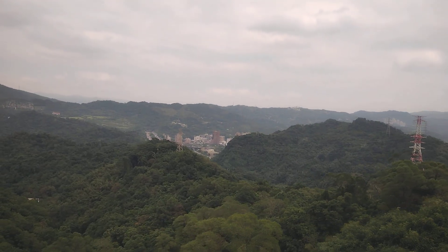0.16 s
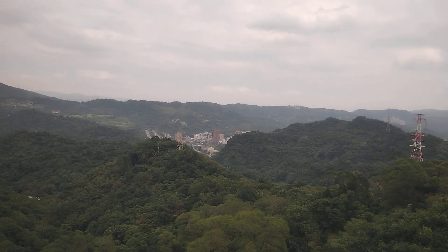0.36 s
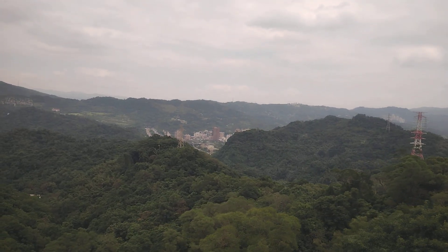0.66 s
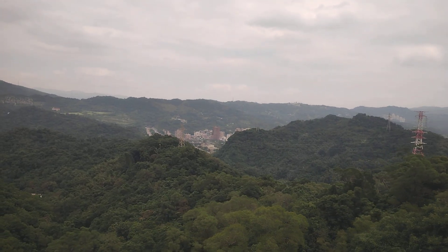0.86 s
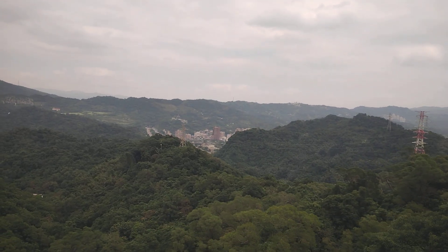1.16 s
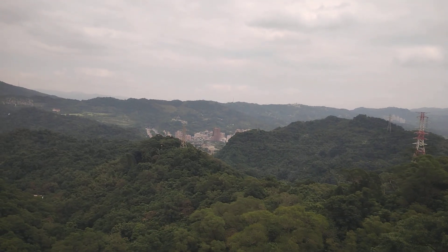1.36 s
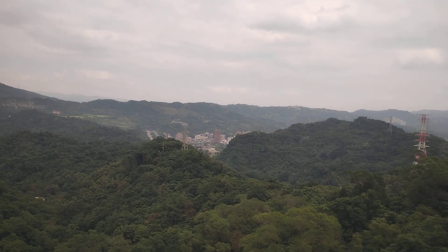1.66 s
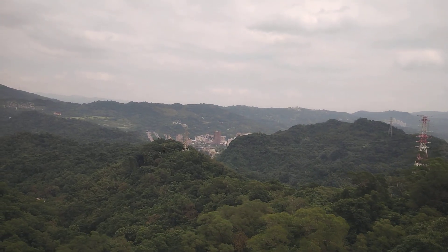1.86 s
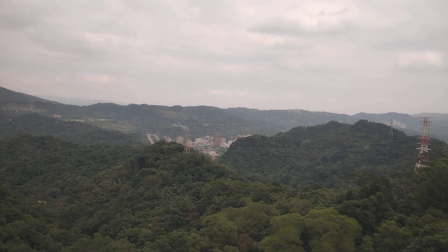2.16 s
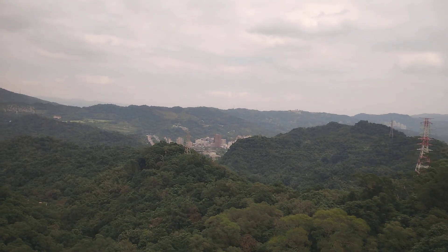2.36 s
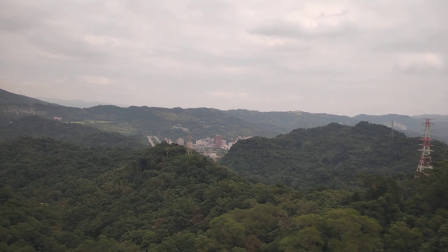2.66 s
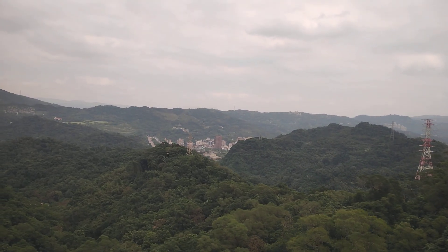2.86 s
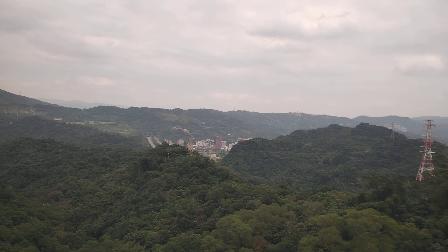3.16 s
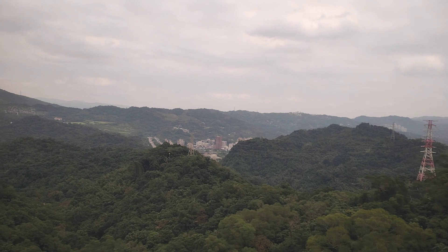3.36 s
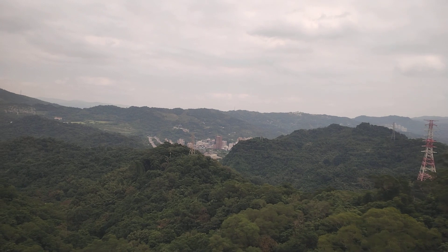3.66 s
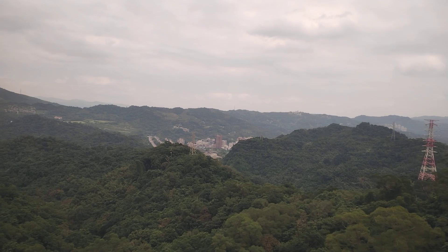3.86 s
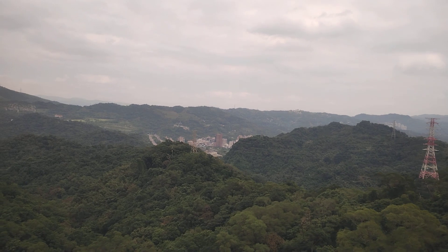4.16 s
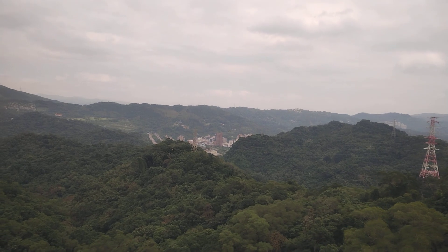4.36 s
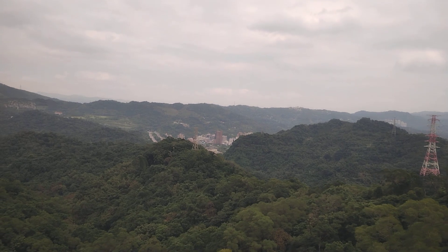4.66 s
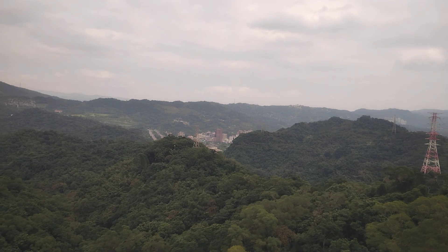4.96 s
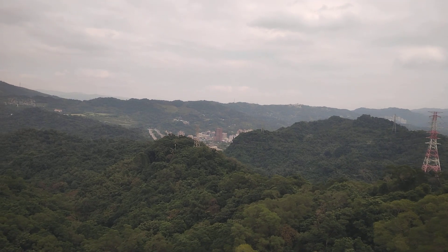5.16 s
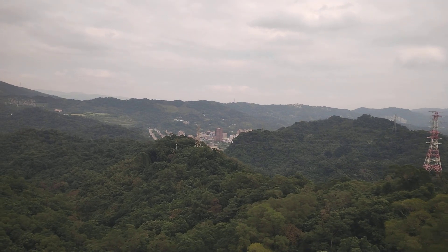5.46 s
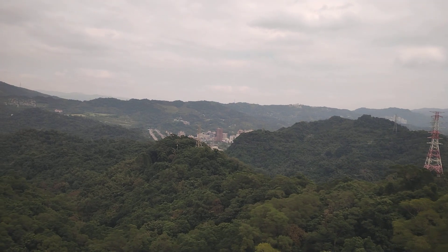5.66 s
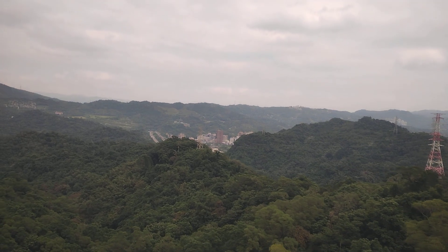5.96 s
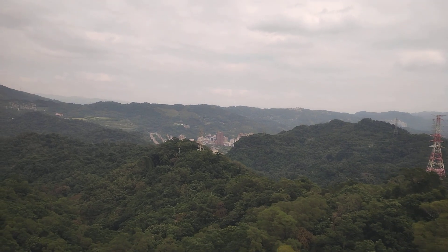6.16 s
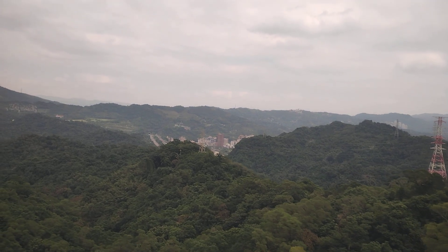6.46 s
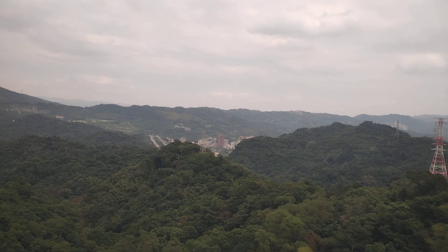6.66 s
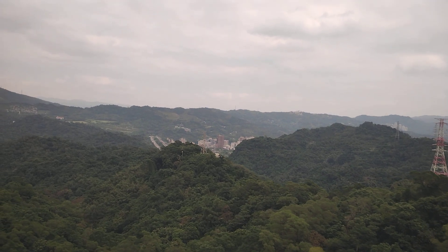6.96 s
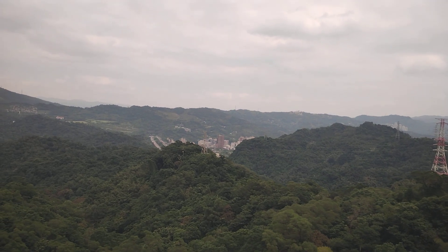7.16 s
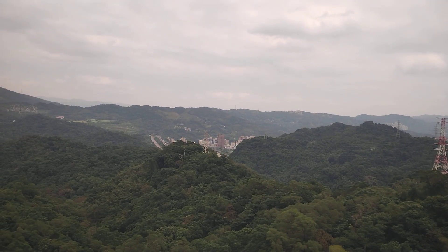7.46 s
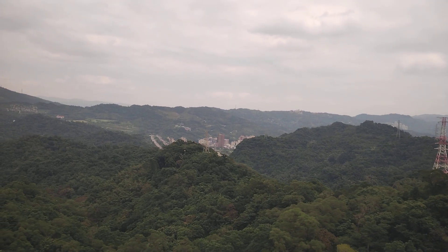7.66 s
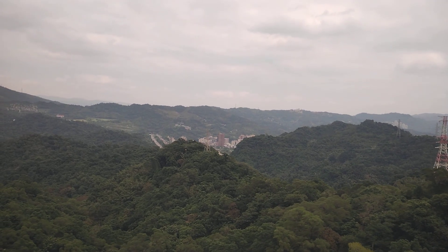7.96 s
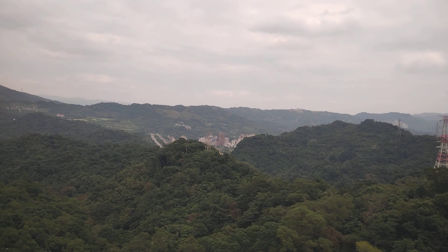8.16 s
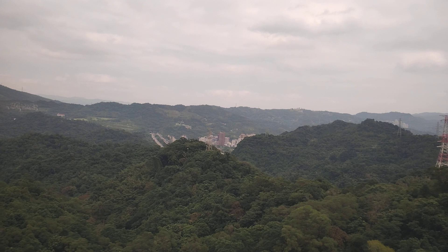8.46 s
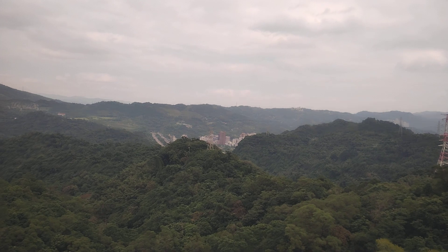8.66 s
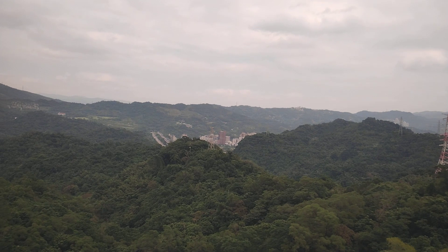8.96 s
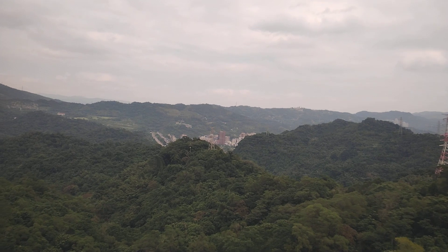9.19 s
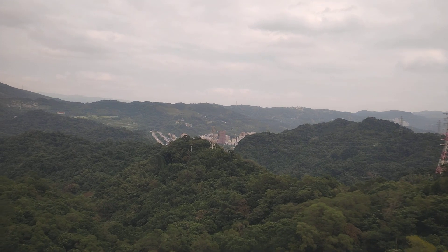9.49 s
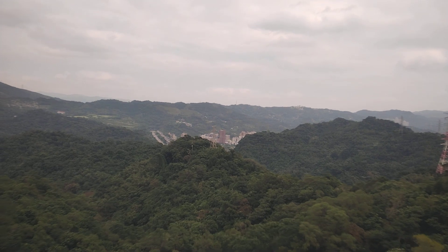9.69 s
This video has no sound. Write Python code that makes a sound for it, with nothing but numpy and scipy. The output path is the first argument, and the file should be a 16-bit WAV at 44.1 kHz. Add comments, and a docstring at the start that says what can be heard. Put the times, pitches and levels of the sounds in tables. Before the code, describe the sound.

A close cabin interior during a smooth cable ride: bass-heavy drone pulsing unevenly, low shell rumble, muffled air and a faint vent hiss on the right. Light rustling and creaking fade early, while tiny dry ticks appear irregularly, mostly to the right. The hum grows fuller after about two and a half seconds; a hollow roar returns after seven, with a knock and quick double snap before nine.

```python
"""Inside a cable car cabin riding its rope. The rope's vibration comes down the hanger as a low drone that
swells and eases: a shaky sine, with a dipping throb about an octave below. Panels tick, snap, thump and rub:
chirped clicks, damped modes and grainy noise, with cabin echo on the knocks. A brief rustle comes early.
Shaped noise makes the shell rumble, a hollow roar, rushing air and a vent on the right.
Faint whistles are fuzzy wandering tones, and an even hiss lies under everything."""
import sys
import numpy as np
from scipy import signal
from scipy.fft import rfft, irfft, next_fast_len
from scipy.io import wavfile

SR = 44100
rng = np.random.default_rng(int(sys.argv[2]) if len(sys.argv) > 2 else 0)


def pcm_store(signal):
    """Save signal as 16-bit PCM."""
    levels = np.round(np.clip(np.atleast_2d(signal), -1, 1) * 32767)
    wavfile.write(sys.argv[1], SR, levels.astype(np.int16).T)


N = 433503  # length in samples
TIME = np.arange(N) / SR


def amp(db):
    """Turns decibels into a gain."""
    return 10 ** (np.asarray(db) / 20)


def unit(x):
    """Scales a signal to an average (rms) size of 1."""
    return x / np.sqrt(np.mean(x ** 2) + 1e-20)


def read(points, hz):
    """Reads a frequency table, with straight lines between its points on a log-frequency axis."""
    f, value = np.transpose(points)
    return np.interp(np.log(hz + 1), np.log(f + 1), value)


def curves(rows):
    """Draws each column of a time table as a curve, sample by sample."""
    seconds, *columns = np.transpose(rows)
    return [np.interp(TIME, seconds, column) for column in columns]


def pan(lean_db):
    """Left and right gains of mean power 1; a positive lean is louder on the left."""
    return unit(amp([[lean_db / 2], [-lean_db / 2]]))


def add(mix, start_s, sound):
    """Mixes a short stereo sound in at its start time."""
    part = mix[:, max(round(start_s * SR), 0):][:, :sound.shape[1]]
    part += sound[:, :part.shape[1]]


def waver(rate_hz):
    """A random wander of rms 1, with little movement faster than the given rate."""
    size = next_fast_len(N)
    hz = np.fft.rfftfreq(size, 1 / SR)
    smooth = rfft(rng.standard_normal(size)) / (1 + (hz / rate_hz) ** 4)
    return unit(irfft(smooth, size)[:N])


# How alike the noise is in the two ears.
# Each row: frequency in Hz, likeness (1 the same, 0 unrelated, negative partly opposite).
EAR_LIKENESS = [(50, 0.91), (150, .98), (260, 0.92), (420, 0.64), (700, .35), (1100, 0), (1600, -0.4),
                (2500, 0), (6000, 0.026)]


def noise(tone, modes=()):
    """Stereo noise of rms 1 with a given spectrum and resonances, alike in both ears in the bass."""
    size = next_fast_len(N)
    hz = np.fft.rfftfreq(size, 1 / SR)
    left, other = rfft(rng.standard_normal((2, size)))
    same = np.clip(read(EAR_LIKENESS, hz), -1, 1)
    right = same * left + np.sqrt(1 - same ** 2) * other
    db = read(tone, hz)
    for centre_hz, width_hz, lift_db in modes:
        db = db + lift_db / (1 + (2 * (hz - centre_hz) / width_hz) ** 2)
    return unit(irfft(np.array([left, right]) * amp(db), size)[:, :N])


def rope(hz, db, octave_db, flutter, wobble):
    """A rope vibration: a sine shaky in level and phase, with a weak octave from the flexing hanger."""
    angle = 2 * np.pi * np.cumsum(hz * np.ones(N)) / SR + wobble * waver(rate_hz=7.8)
    wave = np.sin(angle) + amp(octave_db) * np.sin(2 * angle)
    return np.sqrt(2) * amp(db) * wave * (1 + flutter * waver(rate_hz=11))


# How the rope drone swells and eases. Each row: time in seconds, level in dB before a small trim.
DRONE_LEVEL = [(0.0, -39.5), (0.9, -27), (1.26, -40.5), (1.35, -25), (1.92, -23.5), (2.07, -22.5),
               (2.52, -21.5), (2.61, -16.5), (2.79, -20.5), (2.85, -45), (2.94, -26), (3.15, -15.0),
               (3.33, -24), (3.48, -16.5), (4.05, -18.5), (4.2, -24), (4.38, -15), (4.83, -24.0),
               (4.98, -16.5), (5.25, -23), (5.79, -20.5), (5.91, -36.0), (6.0, -24.0), (6.51, -14.5),
               (6.6, -33.5), (6.78, -18.5), (6.93, -23), (6.99, -14), (7.32, -33), (7.68, -19.0),
               (7.86, -30), (8.04, -27), (8.49, -29.5), (8.67, -24.5), (8.91, -29), (9.21, -16.5),
               (9.27, -24), (9.54, -23.5), (9.75, -13.0), (9.83, -15.5)]
# The slowly moving pitch of the drone. Each row: time in seconds, pitch in Hz.
DRONE_PITCH = [(0.0, 92.3), (0.08, 99.2), (0.46, 92.3), (0.57, 101.1), (0.96, 102.0), (1.45, 95.9),
               (7.77, 96.8), (7.94, 103.8), (8.13, 94.8), (9.83, 98.0)]
DRONE_TRIM_DB = -0.6
SURGE_DB, SURGE_HZ = 1.4, 7  # average size and rate of the quick surges


def drone():
    """The rope hums on one slightly drifting pitch, swelling and easing, with quick small surges."""
    hz = curves(DRONE_PITCH)[0] + 0.33 * waver(rate_hz=2.4)
    surge = unit(waver(rate_hz=SURGE_HZ) * np.sin(2 * np.pi * SURGE_HZ * TIME))
    db = curves(DRONE_LEVEL)[0] + DRONE_TRIM_DB + SURGE_DB * surge
    return rope(hz, db, octave_db=-26.5, flutter=0.099, wobble=0.063) * pan(lean_db=-1.82)


# Weaker rope vibrations beside the throb. Each row: pitch in Hz, level in dB.
NEIGHBOUR_MODES = [(46, -47), (44.17, -43), (41.4, -49)]
THROB_HZ, THROB_DB = 47.25, -32.5  # pitch, and level between dips
THROB_PERIOD_S, THROB_DIP_S = 0.593, 4.82  # time from dip to dip, and the moment of one dip
THROB_DEPTH_DB, THROB_SHARPNESS = 11, 14  # a higher sharpness makes narrower dips


def throb():
    """About an octave lower the rope throbs, dipping at even intervals, beside weaker neighbouring modes."""
    dip = abs(np.cos(np.pi * (TIME - THROB_DIP_S) / THROB_PERIOD_S)) ** THROB_SHARPNESS
    main = rope(THROB_HZ, THROB_DB - THROB_DEPTH_DB * dip, octave_db=-26.5, flutter=0.16, wobble=0.49)
    beside = 0
    for hz, db in NEIGHBOUR_MODES:
        beside = beside + np.sqrt(2) * amp(db) * np.sin(2 * np.pi * (hz * TIME + rng.random()))
    return main + beside


def clicks(rows, tone, spread_s, ring_db, ring_s, size=4096):
    """Slips in a panel joint: bending waves run faster the higher they are, so a click is a falling chirp."""
    out = np.zeros((2, N))
    hz, t = np.fft.rfftfreq(size, 1 / SR), np.arange(size) / SR
    # how much of a row's brightness and body each frequency takes
    treble = read([(3000, 0.28), (9000, 0.89)], hz)
    bass = read([(1800, 0.94), (3500, 0.059)], hz)
    delay = spread_s / np.sqrt(1 + hz / 2500)  # low sound arrives last
    travel = np.exp(-2j * np.pi * np.cumsum(delay) * SR / size)
    for start_s, db, bright_db, lean_db, body_db in rows:
        colour = amp(read(tone, hz) + bright_db * treble + body_db * bass) * travel
        ring = rng.standard_normal((2, size)) * np.exp(-t / ring_s)
        blow = 1 + amp(ring_db) * rfft(ring / np.linalg.norm(ring[0]))  # sharp hit plus noisy ring
        peak = abs(irfft(colour * (hz > 2500))).max()
        add(out, start_s, irfft(colour * blow) / peak * amp(db) * pan(lean_db))
    return out


# Panel ticks. Each row: start in seconds, peak in dB of the part above 2500 Hz before ring and panning,
# brightness in dB (shared out mostly to the treble), left-right lean in dB, body in dB (mostly to the bass).
PANEL_TICKS = [(.4001, -40, -27, -13, 19.5), (.5665, -39.5, -37, -13, 13), (.6427, -45.5, -21, -8, 31),
               (.7605, -44.5, -22, -14, 17), (.8007, -31.5, -28, -22, 9), (.8707, -44.5, -22, -16, 25),
               (1.1699, -21.5, -20, -16.5, -2), (1.1903, -41, -29, -10, 9), (1.3025, -43.5, 4, 7, -2),
               (1.9349, -50.5, -17.5, -9, 30), (2.0074, -46, -26.5, -16.5, 30),
               (2.3959, -44.5, -25, -16, 23.5), (2.8789, -35.5, -14.5, -5.5, 10.5),
               (3.5524, -22, -31.5, -23, 7.5), (3.7039, -45.5, -30.5, -11.5, 17.5),
               (4.4145, -49.5, -18, -11.5, 24.5), (4.4531, -42.5, -13, -11, 22.5),
               (4.5003, -47.5, -20, -6, 25.5), (4.5332, -44, -35, -10.5, 18.5),
               (4.6229, -37.5, -28.5, -17.5, 6), (5.3247, -41, -24.5, -7.5, 10.5),
               (6.7011, -46, -30, -6, 8.5), (8.3251, -30.5, 2, 14, 15), (8.4548, -46.5, -13, 1, -11),
               (8.4656, -39.5, -11, -14, 11)]
# The basic tone of a tick. Each row: frequency in Hz, relative level in dB.
TICK_TONE = [(150, -10.5), (620, 2), (1000, 0.5), (2050, 3), (3100, -1.5), (4200, -1.5), (5400, 3.5),
             (7500, 0.5), (11000, -1.5), (14000, -6)]


def ticks():
    """Small slips of the panels, each a very short chirp with a brief ring."""
    return clicks(PANEL_TICKS, TICK_TONE, spread_s=0.0011, ring_db=-1.5, ring_s=0.00087)


# A double snap in a panel. Each row: start in seconds, peak in dB of the part above 2500 Hz before ring
# and panning, brightness in dB (mostly treble), left-right lean in dB, body in dB (mostly bass).
PANEL_SNAPS = [(8.7402, -25, -3, 1.5, 3), (8.7473, -24, -2, -10, 2.5)]
# The basic tone of a snap. Each row: frequency in Hz, relative level in dB.
SNAP_TONE = [(150, 10), (500, 0), (800, -3), (1050, -1.5), (1300, -2), (1600, 0), (1950, 2), (2300, -16),
             (2850, -10), (3400, -15.5), (4800, -25.5), (6500, -19), (10000, -13), (12500, -21),
             (14000, -38)]


def snaps():
    """Two slips close together, with a longer chirp and ring than the ticks."""
    return clicks(PANEL_SNAPS, SNAP_TONE, spread_s=0.0042, ring_db=1, ring_s=0.0024)


# Dull thumps of the shell. Each row: start in seconds, peak in dB before panning,
# pitch in Hz around which the modes lie, left-right lean in dB.
SHELL_THUMPS = [(1.168, -20, 170, -9), (1.171, -22.5, 445, -15), (3.554, -27, 523, -11),
                (8.466, -21, 284, -16), (8.750, -35, 290, -11)]


def thumps(decay_s, size=8192):
    """Each knock rings a cluster of damped shell modes."""
    out, t = np.zeros((2, N)), np.arange(size) / SR
    for start_s, db, hz, lean_db in SHELL_THUMPS:
        ring = np.zeros(size)
        for ratio in np.geomspace(0.45, 1.6, 9):
            mode_hz = hz * ratio * rng.uniform(1.0, 1.05)
            ring += np.sin(2 * np.pi * mode_hz * t + rng.uniform(0, 2 * np.pi))
        ring *= np.exp(-t / decay_s) * (1 - np.exp(-t / 0.0023))  # soft start, quick fade
        add(out, start_s, ring / abs(ring).max() * amp(db) * pan(lean_db))
    return out


# How long the cabin echoes. Each row: frequency in Hz, seconds to fall by 60 dB.
CABIN_DECAY = [(200, 0.27), (1000, 0.1), (2500, 0.44), (6500, 0.21), (10000, 0.11), (14000, 0.06)]


def cabin(x):
    """Dense reflections from the close windows, each band dying at its own speed."""
    hz, t, z = signal.stft(rng.standard_normal((2, SR // 2)), SR, nperseg=256)
    fade = amp(-60 * t / read(CABIN_DECAY, hz)[:, None])
    tail = signal.istft(z * fade, SR, nperseg=256)[1]
    tail *= np.minimum(np.arange(tail.shape[1]) / SR / 0.011, 1)  # builds up over 11 ms
    tail /= np.linalg.norm(tail[0])
    blended = (x + x.mean(0)) / 2  # each ear also hears the other side
    return signal.fftconvolve(blended, tail, axes=1)[:, :N]


# Short rubs of the panel joints.
# Each row: start in seconds, length in seconds, level in dB at the crest, left-right lean in dB.
JOINT_RUBS = [(0.548, 0.31, -59, -9), (1.154, 0.06, -49, -4), (1.913, 0.15, -70, -12.5),
              (2.861, 0.062, -55, -5), (3.488, 0.1, -46.5, -6), (3.606, .16, -58, -4),
              (4.39, 0.39, -58.5, -7)]
# The tone of a rub. Each row: frequency in Hz, relative level in dB.
RUB_TONE = [(700, -23.5), (1300, 7.5), (1900, 8), (2400, -1.5), (3000, -4.5), (4200, -18), (6500, -28),
            (14000, -30)]
# Resonance of the rubbing joint. Each row: frequency in Hz, width in Hz, lift in dB.
RUB_RESONANCE = [(3950, 500, 13.5)]


def rubs(grain_db):
    """A panel joint creeps: short swells of uneven friction."""
    swell = 0
    for start_s, length_s, db, lean_db in JOINT_RUBS:
        progress = np.clip((TIME - start_s) / length_s, 0, 1)
        swell = swell + amp(db) * pan(lean_db) * np.sin(np.pi * progress)
    friction = noise(RUB_TONE, RUB_RESONANCE) * amp(grain_db * waver(rate_hz=160))
    return unit(friction) * swell


# The tone of the rustle. Each row: frequency in Hz, relative level in dB.
RUSTLE_TONE = [(900, -9), (1700, 0.5), (2500, 10), (3200, 6), (4000, 0), (6000, -7), (7500, -8),
               (9000, -13), (14000, -13.5)]
RUSTLE_PEAK_S, RUSTLE_DB, RUSTLE_RISE_DB_PER_S, RUSTLE_FALL_DB_PER_S = 0.36, -51, 20, 47
RUSTLE_TAIL_DB, RUSTLE_TAIL_DB_PER_S = -59.5, 11  # tail line's level at the peak time, and its fall


def rustle():
    """A soft grainy rustle that swells, drops quickly and lingers as a faint tail."""
    since = TIME - RUSTLE_PEAK_S
    rise_db = RUSTLE_DB + RUSTLE_RISE_DB_PER_S * since
    drop_db = RUSTLE_DB - RUSTLE_FALL_DB_PER_S * since
    tail_db = RUSTLE_TAIL_DB - RUSTLE_TAIL_DB_PER_S * since
    db = np.minimum(rise_db, np.maximum(drop_db, tail_db))
    return noise(RUSTLE_TONE) * amp(db + 1.6 * waver(rate_hz=44)) * pan(lean_db=-1.0)


# The tone of the shell rumble. Each row: frequency in Hz, relative level in dB.
SHELL_TONE = [(15, -52.5), (28, -40), (40, -12), (60, -10.5), (72, -10), (88, 0), (110, 0.5), (130, 1),
              (158, -3), (174, -13), (205, -13.5), (250, -21.5), (330, -38.5), (600, -76)]
# The rumble's rise and fall. Each row: time in seconds, level in dB before the lift below.
RUMBLE_LEVEL = [(0.0, -40), (1.2, -34.5), (2.46, -33.5), (3.24, -33.0), (6.0, -33.5), (6.48, -31),
                (7.92, -38.5), (8.82, -35.5), (9.83, -29)]
RUMBLE_LIFT_DB = 3


def rumble():
    """The shell rumbles: deep noise with an uneven level."""
    db = curves(RUMBLE_LEVEL)[0] + RUMBLE_LIFT_DB + 1.9 * waver(rate_hz=14)
    return noise(SHELL_TONE) * amp(db) * pan(lean_db=-1.2)


# Shell resonances, heard in both the roar and the air.
# Each row: frequency in Hz, width in Hz, lift in dB.
SHELL_RESONANCES = [(222, 5.5, 1.5), (244.4, 3.7, 5.5), (272, 3.7, 3), (292, 8, 0.5), (367, 25, 5),
                    (447.4, 9.7, 7), (539, 36, 5), (622, 24, 5.5), (712, 46, 5), (804, 24, 4.5)]
# The roar's fading and return. Each row: time in seconds, level in dB.
ROAR_LEVEL = [(0, -43.5), (1.3, -53.5), (2, -61), (6.8, -63.5), (7.5, -45.5), (8.3, -46.5), (9, -42),
              (9.83, -46)]
# The tone of the roar. Each row: frequency in Hz, relative level in dB.
ROAR_TONE = [(140, -25), (190, -2), (285, -1), (340, -10.5), (420, -5), (500, -24), (900, -59.5)]


def roar():
    """A hollow roar, ringing the shell resonances, sinks early and builds again late in the ride."""
    return noise(ROAR_TONE, SHELL_RESONANCES) * amp(curves(ROAR_LEVEL)[0]) * pan(lean_db=-4.0)


# The tone of the rushing air. Each row: frequency in Hz, relative level in dB.
AIR_TONE = [(120, -35.5), (230, -3.5), (280, 1.5), (325, -3.5), (380, -2.5), (490, -8), (750, -10),
            (1050, -10.5), (1400, -18.5), (1900, -24), (2300, -28), (3100, -36.5), (3400, -39), (8000, -48)]
AIR_DB, AIR_DB_PER_S = -42, -0.16  # level at the start, and its slow easing


def air_rush():
    """Air rushes round the shell, rings its resonances and slowly eases."""
    db = AIR_DB + AIR_DB_PER_S * TIME + 0.75 * waver(rate_hz=4.4)
    return noise(AIR_TONE, SHELL_RESONANCES) * amp(db) * pan(lean_db=-0.34)


# The tone of the vent. Each row: frequency in Hz, relative level in dB.
VENT_TONE = [(550, -18.5), (850, -4), (1100, -2.5), (1400, -3.5), (1650, -2.5), (1950, -6), (2200, -12.5),
             (2600, -17.5), (3050, -22.5), (3300, -32), (4500, -42), (9000, -67.5)]
VENT_DB, VENT_EXTRA_DB, VENT_SETTLE_S = -53.5, 4.5, 1.4  # settled level, extra at the start, settling time


def vent():
    """Air streaming past a vent on the right settles to a hiss."""
    db = VENT_DB + VENT_EXTRA_DB * np.exp(-TIME / VENT_SETTLE_S)
    return noise(VENT_TONE) * amp(db + 1.0 * waver(rate_hz=19)) * pan(lean_db=-21.5)


# Faint air whistles, one table each. Each row: time in seconds, pitch in Hz, level in dB.
AIR_WHISTLES = [
    [(0, 985, -52), (.8, 853, -49), (1.7, 793.5, -52), (2.8, 736.3, -61.5), (5.2, 748.5, -59),
     (6.2, 738, -70.5)],
    [(0, 1682, -52.5), (1.5, 1657, -57), (3.2, 1608, -62), (5, 1679, -63.5), (7.5, 1880, -71),
     (9.83, 1826, -62.5)],
    [(6.2, 3037, -82), (6.65, 3040, -69.5), (7.6, 3015, -66), (8.7, 2997, -79)],
    [(6.1, 2700, -91), (6.7, 2683, -72), (7.7, 2660, -66.5), (8.3, 2720, -77)],
]
# How fuzzy each whistle is: one wander rate in Hz for each, in the same order.
WHISTLE_WIDTHS_HZ = [81, 75, 55, 250]


def whistles(stray):
    """Air through narrow gaps: fuzzy tones that drift with the flow; stray is phase wander in radians."""
    out = np.zeros((2, N))
    for rows, width_hz in zip(AIR_WHISTLES, WHISTLE_WIDTHS_HZ):
        hz, db = curves(rows)
        angle = 2 * np.pi * np.cumsum(hz) / SR
        ears = []
        for _ in range(2):
            fuzzy = np.sin(angle + stray * waver(rate_hz=width_hz))
            ears.append(fuzzy * waver(rate_hz=width_hz))
        fade = np.interp(TIME - rows[-1][0], [0, 0.5], [1, 0])  # out within half a second of the last row
        out += unit(np.array(ears)) * amp(db) * fade
    return out * pan(lean_db=-5.5)


# The tone of the faint hiss. Each row: frequency in Hz, relative level in dB.
HISS_TONE = [(1500, -10), (3300, -5.5), (4200, -4), (7000, 1.5), (10000, -2), (14400, -13.5)]
HISS_DB = -77.5


def hiss():
    """A faint, even hiss: steady noise in the treble."""
    return noise(HISS_TONE) * amp(HISS_DB)


def scene():
    """Rope drone and throb, small sounds of the panels with their echo, ride noise and a faint hiss."""
    hum = drone() + throb()
    knocks = ticks() + snaps() + thumps(decay_s=0.01)
    echo = amp(-17.5) * cabin(knocks)
    friction = rubs(grain_db=3.5) + rustle()
    ride = rumble() + roar() + air_rush() + vent() + whistles(stray=1.2)
    return hum + knocks + echo + friction + ride + hiss()


EDGE_HZ = 14400  # top of the sound's range


def record(dry):
    """Limits the band with a steep low-pass filter."""
    padded = np.pad(dry, ((0, 0), (255, 255)), "reflect", reflect_type="odd")  # keeps the ends smooth
    low_pass = signal.firwin(511, EDGE_HZ, window=("kaiser", 9), fs=SR)
    return signal.oaconvolve(padded, low_pass[None], "valid")


dry = scene()
out = record(dry)
pcm_store(out)
```